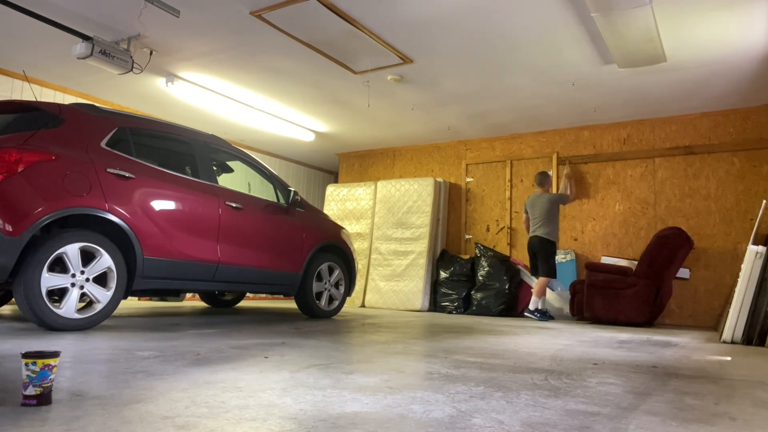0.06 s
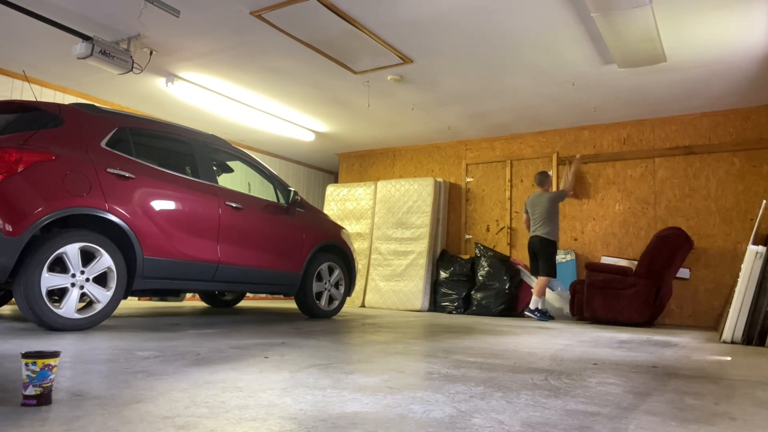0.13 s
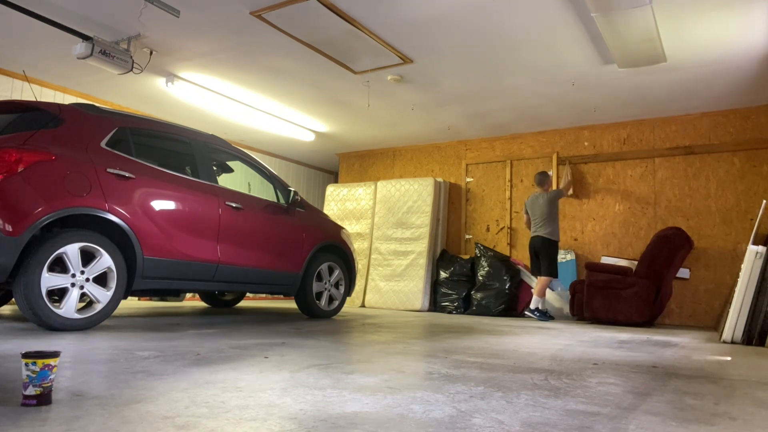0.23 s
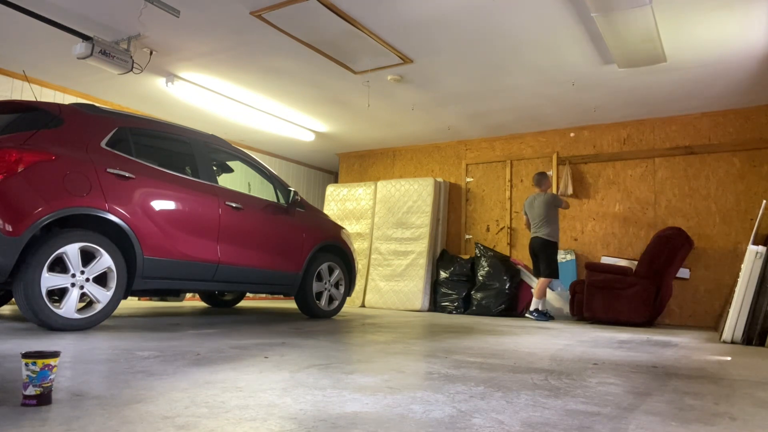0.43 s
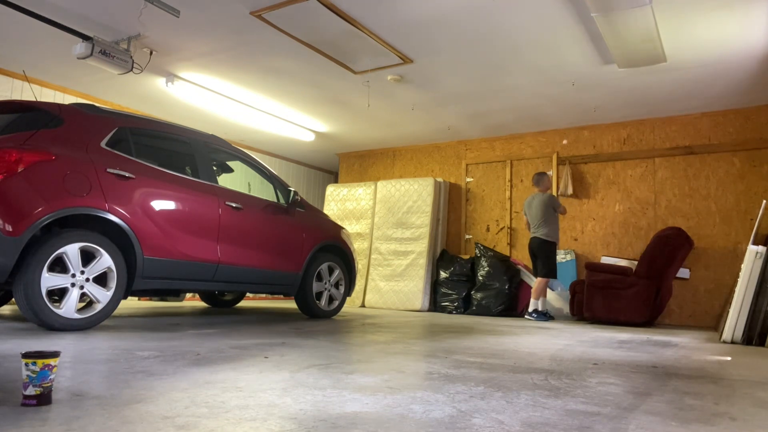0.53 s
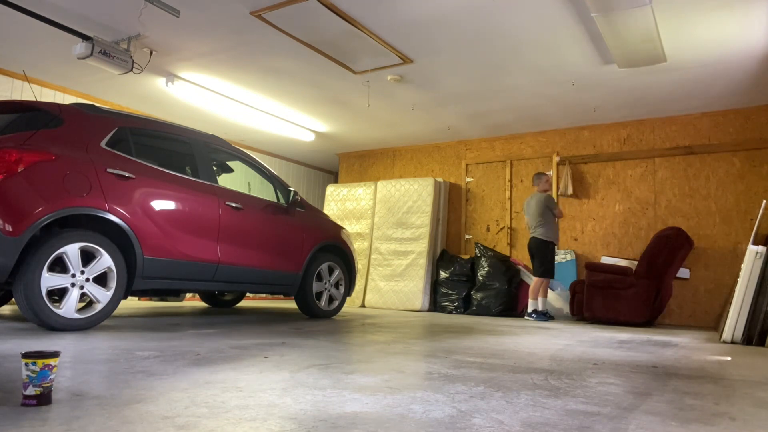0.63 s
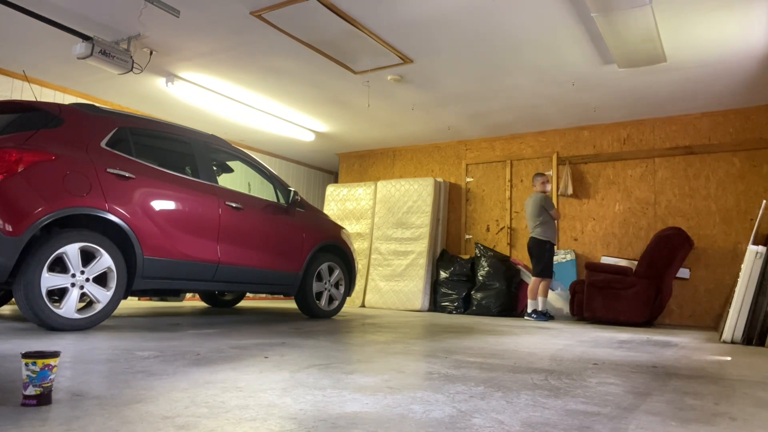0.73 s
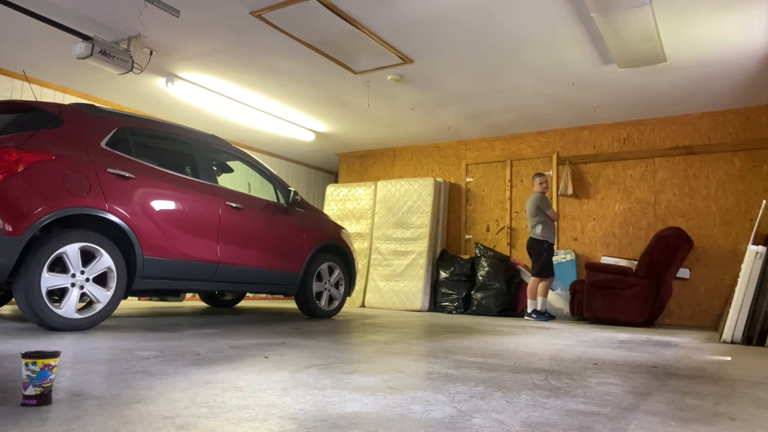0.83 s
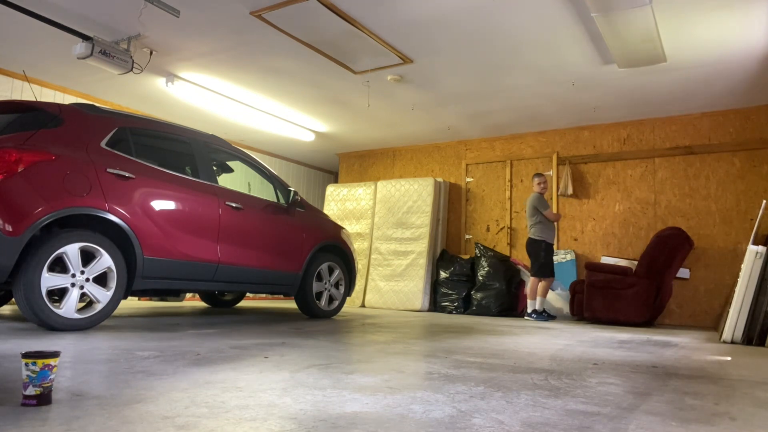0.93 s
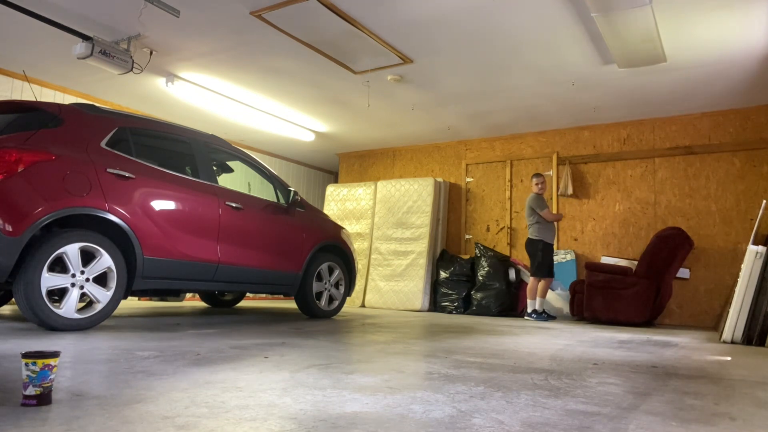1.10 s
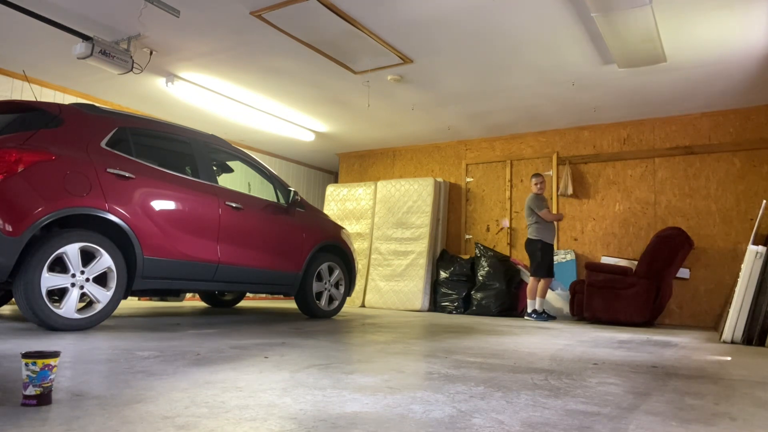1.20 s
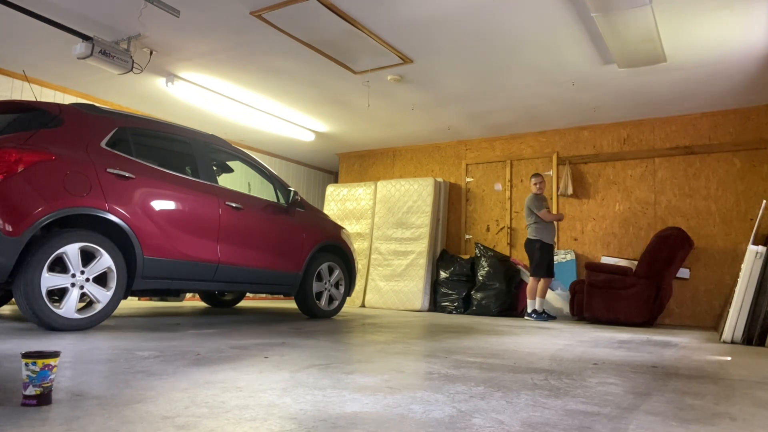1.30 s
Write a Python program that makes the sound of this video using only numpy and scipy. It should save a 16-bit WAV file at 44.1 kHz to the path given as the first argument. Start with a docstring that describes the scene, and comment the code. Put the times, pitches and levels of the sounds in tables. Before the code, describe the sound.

Hard plastic ball smacks a wood panel wall with a hollow boom, then ticks off garage concrete

```python
"""A light hard plastic ball in a bare garage, over a steady low rumble of coloured noise.
First an earlier bounce still rings, with two small ticks, and the level dips briefly. Then the ball cracks
against a wooden wall: short modes and noise snaps, panel modes booming on, a hollow hum swelling in the boom.
A shoe scuffs faintly (a noise swell), then the ball clicks on the concrete floor: short modes and a snap.
After each blow the room rings as stereo noise that dies band by band."""
import sys
import numpy as np
from scipy import signal
from scipy.fft import rfft, irfft
from scipy.io import wavfile

SR = 44100
rng = np.random.default_rng(int(sys.argv[2]) if len(sys.argv) > 2 else 0)


def master_out(mix):
    """Clip the mix to full scale and print it as 16-bit PCM to the path in sys.argv[1]."""
    frames = np.transpose(np.atleast_2d(mix))
    ceiling = np.clip(frames, -1, 1)
    pcm = np.round(ceiling * 32767).astype(np.int16)
    wavfile.write(sys.argv[1], SR, pcm)


N = 59535
TIME = np.arange(N) / SR  # s
RIGHT_DB = -3  # right microphone against left, for the direct crack and the thump


def from_db(db):
    """Decibels to gain."""
    return 10 ** (np.asarray(db) / 20)


def at_hz(points, hz, axis=1):
    """Read a column of a table on a log-frequency axis."""
    table = np.array(points)
    return np.interp(np.log(hz), np.log(table[:, 0]), table[:, axis])


def struck(start, rise, t60):
    """Envelope of a blow: an exponential rise (time constant, s) and a decay of 60 dB in t60 (s)."""
    age = np.maximum(TIME - start, 0)
    return (1 - np.exp(-age / rise)) * np.exp(-np.log(1000) * age / t60)


def mode(start, hz, rise, t60):
    """One struck resonance: a sine that dies away."""
    return struck(start, rise, t60) * np.sin(2 * np.pi * hz * (TIME - start))


def flexing(start, hz, rise, t60):
    """A mode of the heavy panel, which starts to move gently: the rise acts twice."""
    return mode(start, hz, rise, t60) * (1 - np.exp(-np.maximum(TIME - start, 0) / rise))


def diffuse(spectrum, envelope):
    """Coloured stereo noise of rms 1, split into half-octave bands, each then under envelope(Hz)."""
    # diffuse sound at the two microphones: [f/Hz, correlation -1 to 1, left minus right level/dB]
    mics = [(60, .88, 1), (150, .85, 0), (300, 0.57, 3), (580, -0.89, 0.5), (1100, -0.37, 3),
            (2000, 0.27, 4), (3500, 0, 6), (9000, 0, 7)]
    hz = np.maximum(np.arange(N // 2 + 1) * SR / N, 1)
    sign = np.array([[1], [-1]])  # left, right
    mid, side = rfft(rng.standard_normal((2, N)))
    alike = np.clip(at_hz(mics, hz), -1, 1)
    pair = np.sqrt(1 + alike) * mid + np.sqrt(1 - alike) * side * sign
    balance = sign * at_hz(mics, hz, axis=2) / 2
    noise = pair * from_db(at_hz(spectrum, hz) + balance)
    centres = 60 * 2 ** (np.arange(16) / 2)  # Hz
    total = np.zeros((2, N))
    for centre, peak in zip(centres, np.eye(len(centres))):
        # neighbouring bands crossfade, so that the shares add up to 1
        share = np.interp(np.log(hz), np.log(centres), peak)
        total += irfft(noise * share, N) * envelope(centre)
    return total / np.std(irfft(noise, N))


def room_ring(start, spectrum):
    """The garage's reverberation arrives just after a blow, each band dying at its own rate."""
    # decay of the room: [f/Hz, t60/s]
    room_t60 = [(100, 0.74), (280, 0.6), (550, 0.64), (1000, 0.71), (1500, 0.64), (2100, 0.72),
                (2800, 0.66), (4000, 0.66), (8000, 0.54), (11000, .42)]
    delay, rise = 0.0016, 0.0034  # s
    return diffuse(spectrum, lambda hz: struck(start + delay, rise, at_hz(room_t60, hz)))


def snap(start, db, spectrum):
    """A few milliseconds of dense crackle as a surface is struck."""
    rise, t60 = 0.0016, 0.014  # s
    return from_db(db) * diffuse(spectrum, lambda hz: struck(start, rise, t60))


def tap(start, db, hz):
    """A small snap with one broad spectral peak."""
    spread = 1.7  # ratio of edge frequency to centre
    return snap(start, db, [(hz / spread, -24), (hz, 0), (hz * spread, -30), (SR / 2, -60)])


def contact(start, db, lag, modes):
    """A short crack of the ball, first at the left microphone, followed by its early reflections."""
    # early reflections: [delay/s, left level/dB, right level/dB]
    echoes = [(.0011, -6.5, -8), (.0063, -15.5, -20), (.0158, -18, -18.5)]
    rise = 0.0016  # s
    crack = np.zeros(N)
    for k, (hz, level, t60) in enumerate(modes):
        # every other mode starts downwards
        crack += (-1) ** k * from_db(db + level) * mode(start, hz, rise, t60)

    def late(delay):
        """The crack delayed by a travel time (s)."""
        return np.interp(TIME - delay, TIME, crack)

    heard = np.array([crack, from_db(RIGHT_DB) * late(lag)])
    for delay, left, right in echoes:
        heard += np.array([from_db(left) * late(delay), from_db(right) * late(delay + lag)])
    return heard


def rumble():
    """Steady low background noise."""
    # colour of the rumble: [f/Hz, relative level per Hz/dB]
    rumble_colour = [(30, -16.5), (60, 2.5), (80, 0), (100, -7), (120, -1.5), (200, -15.5), (330, -20),
                     (500, -10.5), (750, -27), (1800, -35.5), (2700, -39), (4000, -45.5), (7500, -43.5),
                     (9500, -62)]
    return from_db(-54.5) * diffuse(rumble_colour, lambda hz: 1)


def shoe_scuff():
    """One soft scuff of a shoe: noise under a bell-shaped swell."""
    # colour of the scuff: [f/Hz, relative level per Hz/dB]
    scuff_colour = [(300, -16), (1000, -0.5), (2200, 5.5), (3600, 2.5), (6500, -8.5), (10000, -40.5)]
    centre, width = 0.912, 0.091  # s
    swell = np.exp(-((TIME - centre) / width) ** 2)
    return from_db(-63.5) * diffuse(scuff_colour, lambda hz: swell)


def earlier_bounce():
    """The room still rings from a bounce before the start, with two small ticks; it ends in the dip."""
    # small far ticks: [t/s, level/dB, centre f/Hz]
    tick_rows = [(0.0072, -29.5, 1330), (0.0210, -28.5, 1610)]
    # colour of the old ring: [f/Hz, relative level per Hz/dB]
    old_ring = [(80, -11), (300, -22), (500, 7.5), (750, -6), (1150, 2), (1550, 3), (2800, -9),
                (4700, -10.5), (5800, -14.5), (7000, -3), (8400, -6), (9300, -20), (11000, -26)]
    bounce, end = -0.045, 0.069  # s
    ticks = sum(tap(*row) for row in tick_rows)
    ring = from_db(-44) * room_ring(bounce, old_ring)
    return (ticks + ring) * (TIME < end)


def floor_hit():
    """Concrete does not give: only the ball's click and the room."""
    # the ball meets the floor: [t/s, level/dB, lag of the right microphone/s]
    floor_blow = (1.0213, -10.5, 0.00019)
    # modes of the click: [f/Hz, level relative to the blow/dB, t60/s]
    click_modes = [(481, -7, .008), (1316, -0.5, 0.0086), (1590, 2, 0.0081), (2130, 0, 0.013),
                   (3236, -3.5, 0.015), (4530, -12.5, 0.0057), (6604, -8, 0.009), (7870, -13.5, 0.01)]
    # colours of the snap and of the room's ring: [f/Hz, relative level per Hz/dB]
    snap_colour = [(100, -27), (300, -11), (1000, -8), (2000, 5), (3300, -5), (5500, -18.5), (8500, -3),
                   (10500, -35.5)]
    ring_colour = [(80, -17), (300, -6.5), (600, 3), (1000, -3.5), (1500, 2), (2000, 2.5), (2800, -7.5),
                   (3900, -13.5), (4600, -11), (5800, -18.5), (8400, -8), (9200, -24.5), (10200, -17.5),
                   (11000, -57)]
    start = floor_blow[0]
    click = contact(*floor_blow, click_modes) + snap(start, -21.5, snap_colour)
    return click + from_db(-32.5) * room_ring(start, ring_colour)


def panel_rattle(start):
    """The panel rattles in small taps just after the crack."""
    # rattles: [delay/s, level/dB, centre f/Hz]
    rattles = [(.0065, -16.5, 2130), (.0082, -14.5, 3300), (0.0138, -18.5, 5800), (0.0153, -18, 1550)]
    return sum(tap(start + delay, db, hz) for delay, db, hz in rattles)


def panel_boom(start):
    """The panel flexes with a short thump and booms on in its slow modes; a hollow hum swells late."""
    # modes of the panel and the air before it: [f/Hz, left level/dB, t60/s, right minus left level/dB]
    panel_modes = [(117.4, -45.5, 0.93, 2.5), (154.6, -30, 0.48, 3), (182.45, -18.5, .44, -1),
                   (215.6, -28, 0.66, 3), (227.6, -33, .3, -6), (274, -21, 0.6, -19), (324.7, -30.5, .6, 3),
                   (371.2, -33, 0.81, -12), (465.8, -38, 0.9, -9), (546, -37, 0.5, -0.5),
                   (597.4, -37, 0.35, -1)]
    flex = start + 0.0008  # s
    thump_gain = from_db([[12.5], [12.5 + RIGHT_DB]])
    boom = thump_gain * flexing(flex, hz=231, rise=0.0096, t60=0.042)
    for hz, level, t60, right in panel_modes:
        boom += from_db([[level], [level + right]]) * flexing(flex, hz, 0.004, t60)
    hum = from_db(-35) * mode(start=0.378, hz=503, rise=0.014, t60=0.47)
    return boom + hum


def wall_hit():
    """The ball cracks on the wooden wall; the panel rattles and booms, and the room rings."""
    # the ball meets the wall: [t/s, level/dB, lag of the right microphone/s]
    wall_blow = (0.2296, -6, .00006)
    # modes of the crack: [f/Hz, level relative to the blow/dB, t60/s]
    crack_modes = [(990, -16.5, 0.016), (1720, 1.5, 0.0091), (2250, -4, .012), (3220, 6.5, 0.0098),
                   (5870, -7, .014), (6450, -6, 0.0079), (7600, -13.5, .01)]
    # colours of the snap, the early noise and the room's ring: [f/Hz, relative level per Hz/dB]
    snap_colour = [(100, -24), (500, -4.5), (1700, 3), (2600, -15.5), (3300, -2.5), (4400, -18),
                   (6500, -12.5), (8500, -16.5), (10500, -32.5)]
    early_colour = [(60, -33.5), (130, -12), (260, 14), (600, 2), (1200, -7), (1800, 3), (2700, -14),
                    (3500, -8), (4600, -22), (6000, -23), (8300, -28), (9500, -39)]
    ring_colour = [(50, -22.5), (100, -8), (200, 1), (380, -4.5), (560, 4.5), (720, -9), (1000, -4.5),
                   (1280, -12.5), (1550, -6.5), (2100, -11.5), (2800, -21.5), (3400, -15), (4700, -28.5),
                   (5800, -21.5), (6700, -27), (8300, -28), (9300, -47.5), (11000, -53)]
    start = wall_blow[0]
    crack = contact(*wall_blow, crack_modes) + snap(start, -10, snap_colour)
    early = from_db(-12.5) * diffuse(early_colour, lambda hz: struck(start, rise=0.005, t60=0.066))
    ring = from_db(-18) * room_ring(start, ring_colour)
    return crack + panel_rattle(start) + panel_boom(start) + early + ring


def scene():
    """All sources at the two microphones."""
    return rumble() + shoe_scuff() + earlier_bounce() + floor_hit() + wall_hit()


def record(dry):
    """The level dips briefly near the start; a steep low-pass cuts the top."""
    # the dip: [t/s, level/dB], heard relative to the last row
    dip = [(.045, -2.5), (.06, -14), (.07, -25.5), (.085, -1.5)]
    level = np.interp(TIME, *np.transpose(dip)) - dip[-1][1]
    dipped = dry * from_db(level)
    # order 8, 0.3 dB ripple, 70 dB rejection, cutoff 11 kHz
    low_pass = signal.ellip(8, 0.3, 70, 11000, fs=SR, output="sos")
    return signal.sosfilt(low_pass, dipped)


dry = scene()
out = record(dry)
master_out(out)
```